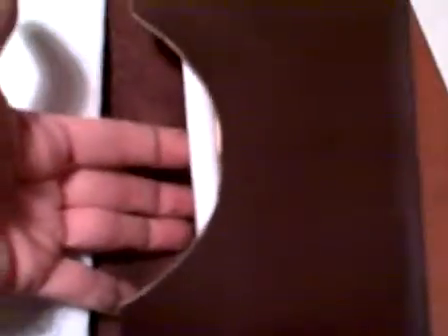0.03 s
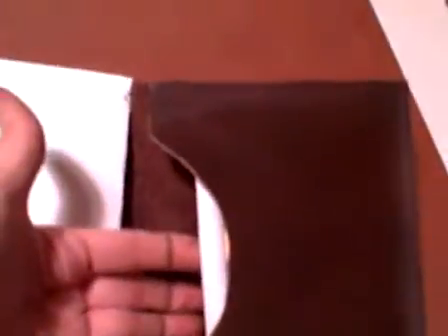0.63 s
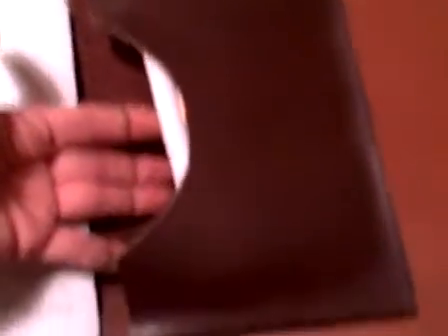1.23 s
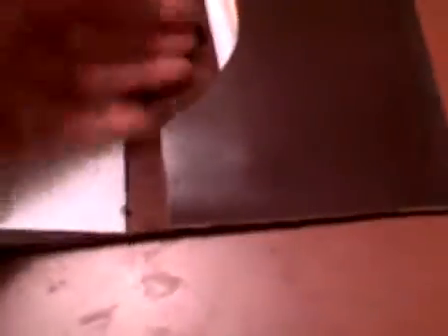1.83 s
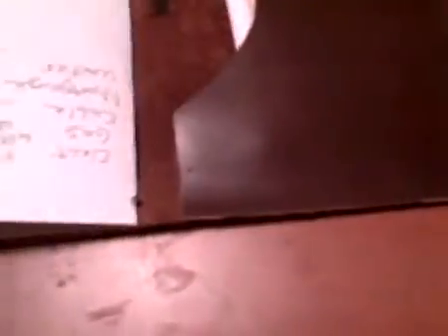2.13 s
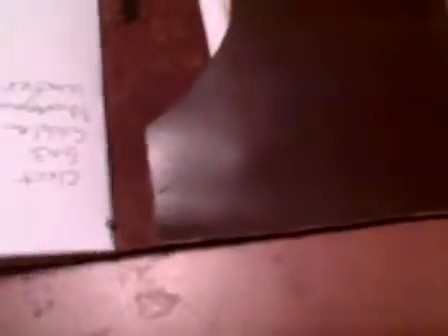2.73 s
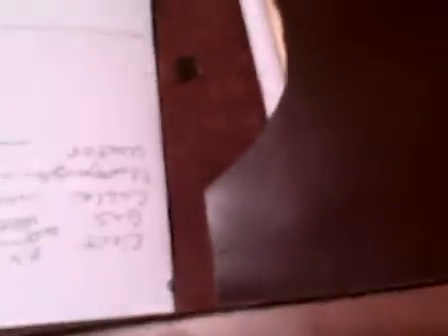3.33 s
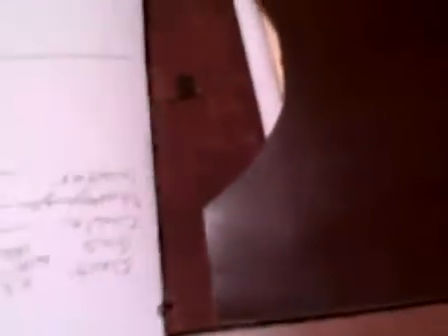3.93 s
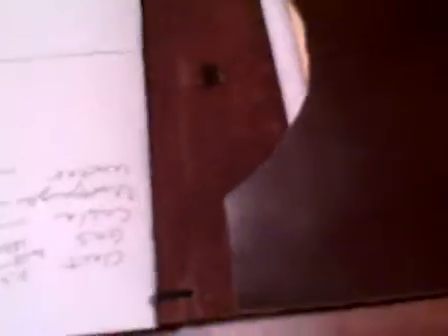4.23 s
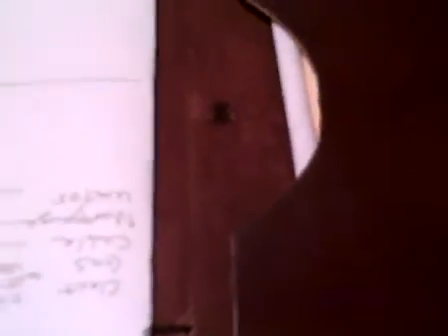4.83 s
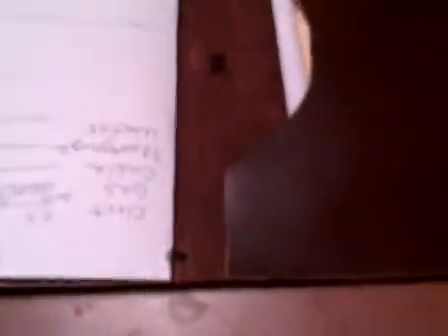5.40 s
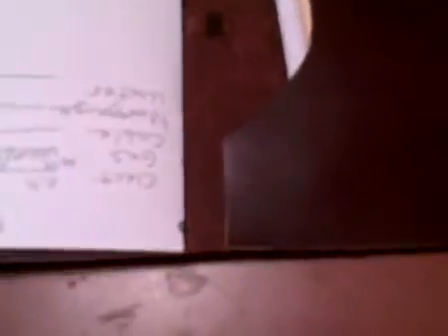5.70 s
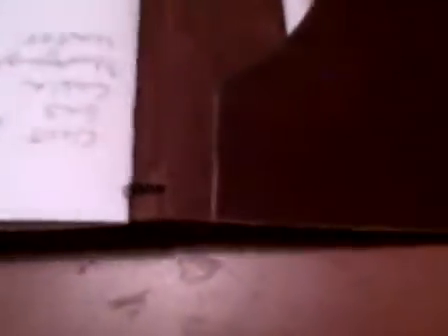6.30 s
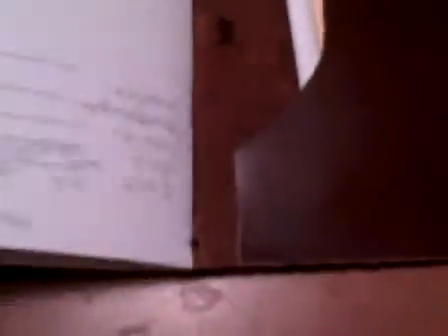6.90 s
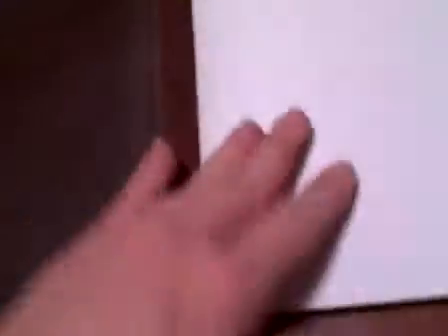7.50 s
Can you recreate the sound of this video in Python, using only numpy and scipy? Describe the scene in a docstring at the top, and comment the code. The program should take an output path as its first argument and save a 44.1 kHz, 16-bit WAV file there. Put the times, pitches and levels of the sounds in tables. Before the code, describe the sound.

A hand slides into a leather folder pocket and shuffles papers, with rustles, crisp snaps and a page turn over quiet room hum.

```python
"""A quiet room hums throughout. Sheets stir, then at 0.9 s a hand slides into the pocket of a leather
folder on a table, skin scraping on leather. From 1.7 s it works the papers: sheets hiss over each other,
leather creaks, creases snap and the cover bumps softly. Lighter strokes follow, a hard tap on the cover
at 6.5 s, and last a page turns. The small microphone rings near 6.5 kHz and passes little above that."""
import sys
import numpy as np
from scipy import signal
from scipy.fft import rfft, irfft
from scipy.io import wavfile

SR = 44100
rng = np.random.default_rng(int(sys.argv[2]) if len(sys.argv) > 2 else 0)


def master(y):
    """Save y as 16-bit WAV."""
    cut = np.clip(np.atleast_2d(y).T, -1, 1)
    pcm = np.round(cut * 32767)  # scale
    wavfile.write(sys.argv[1], SR, pcm.astype(np.int16))


N = 332955


def from_db(db):
    """Decibels to gain."""
    return 10 ** (np.asarray(db) / 20)


def unit_rms(x):
    """Scale to unit power."""
    return x / np.sqrt(np.mean(x ** 2) + 1e-20)


def automation(rows):
    """Join timed breakpoints with straight lines, one curve per value column."""
    times, *columns = np.transpose(rows)
    return [np.interp(np.arange(N) / SR, times, column) for column in columns]


def drift(rate_hz):
    """Slow random modulation with a spread of 1."""
    hop, settle = 40, 2000
    pole = np.exp(-2 * np.pi * rate_hz * hop / SR)
    noise = rng.standard_normal(N // hop + settle + 2)
    slow = signal.lfilter([1], [1, -2 * pole, pole * pole], noise)[settle:]
    return np.interp(np.arange(N) / hop, np.arange(len(slow)), unit_rms(slow))


def equalise(x, spectrum):
    """Apply an EQ curve that falls 20 dB per octave beyond its ends; rms 1."""
    hz, db = np.transpose(spectrum)
    octave = np.log2(np.maximum(np.fft.rfftfreq(len(x), 1 / SR), 1))
    beyond = np.abs(octave - np.clip(octave, np.log2(hz[0]), np.log2(hz[-1])))
    gain = from_db(np.interp(octave, np.log2(hz), db) - 20 * beyond)
    return unit_rms(irfft(rfft(x) * gain, len(x)))


def place(out, start_s, sound):
    """Mix a one-shot in at its cue."""
    i = int(start_s * SR)
    out[i:i + len(sound)] += sound[:N - i]


def microphone(x, ring_hz=6570, width_hz=1160, ring_gain=1.54, top_hz=7440):
    """The port of the capsule rings at one pitch; above it the response drops quickly."""
    port = signal.lfilter(*signal.iirpeak(ring_hz, ring_hz / width_hz, fs=SR), x)
    return signal.sosfilt(signal.butter(9, top_hz, fs=SR, output="sos"), x + ring_gain * port)


def wavering_tone(hz):
    """A sine slightly unsteady in pitch and level; rms 1."""
    phase = 2 * np.pi * np.cumsum(hz + drift(5.75)) / SR
    return unit_rms(np.sin(phase) * from_db(2 * drift(3.6)))


# EQ of the room rumble and the microphone hiss: (frequency [Hz], relative level [dB])
RUMBLE_EQ = [(22, -13), (30, 0), (42, 0.5), (60, -1), (85, -6), (118, -6), (145, -12.5), (200, -9),
             (260, -15), (320, -11), (450, -19), (700, -25), (1000, -23.5), (1500, -45)]
MIC_HISS_EQ = [(700, -6.5), (1300, -1), (3000, -2), (5000, -2), (7000, -2), (8500, -5)]
# Partials of the room hum: (frequency [Hz], rms level [dB])
HUM_PARTIALS = [(41, -56), (86, -58.5), (99, -62), (172, -63), (221, -63.5), (299, -64.5), (342, -65.5),
                (458, -68.5), (684, -72)]
# Two faint drones that swell and glide: (time [s], pitch [Hz], rms level [dB])
UPPER_DRONE = [(0, 190, -68), (1.0, 190, -56), (1.5, 189, -60), (2.0, 187, -54), (2.8, 186, -55),
               (3.3, 184, -65), (4.1, 186, -60), (4.6, 198, -55), (5.1, 206, -52.5), (5.5, 207, -64),
               (5.8, 190, -67), (6.4, 192, -57), (6.9, 195, -55), (7.55, 192, -61)]
LOWER_DRONE = [(3.45, 102, -85), (3.6, 102, -51), (3.9, 104, -54), (4.25, 108, -59), (4.5, 108, -85)]


def room_tone():
    """The bed: room rumble, hum, swelling drones and the hiss of the microphone."""
    rumble = from_db(-47.5) * equalise(rng.standard_normal(N), RUMBLE_EQ)
    hiss = from_db(-58.0) * equalise(rng.standard_normal(N), MIC_HISS_EQ)
    hum = sum(from_db(db) * wavering_tone(hz) for hz, db in HUM_PARTIALS)
    drones = sum(from_db(db) * wavering_tone(hz) for hz, db in map(automation, (UPPER_DRONE, LOWER_DRONE)))
    return rumble + hiss + hum + drones


def reflections(x, t60_s=0.11, predelay_s=0.002):
    """The table and near walls return a short diffuse tail."""
    t = np.arange(SR // 3) / SR
    tail = rng.standard_normal(len(t)) * from_db(-60 * t / t60_s) * (t > predelay_s)
    return signal.fftconvolve(x, tail / np.linalg.norm(tail))[:N]


# Soft thuds of hand and cover: (time [s], level [dB], pitch [Hz], decay [s])
BUMP_CUES = [(0.534, -29, 172, 0.0072), (1.296, -37, 478, 0.019), (2.155, -34.5, 417, 0.0061),
             (2.718, -38, 126, 0.018), (2.998, -32, 594, 0.0039), (3.004, -29.5, 167, 0.0043),
             (3.281, -35, 1240, 0.0051), (3.312, -42, 280, 0.013), (3.564, -26, 151, 0.0044),
             (6.937, -32.5, 147, 0.012), (7.283, -44, 520, .006), (7.431, -36, 52.7, 0.058),
             (7.5, -28.5, 63, 0.015)]


def cover_bumps(attack_s=0.0006):
    """The padded cover answers a soft push with one damped low note."""
    out, t = np.zeros(N), np.arange(SR // 4) / SR
    for start, db, hz, decay in BUMP_CUES:
        envelope = np.exp(-t / decay) * (1 - np.exp(-t / attack_s))
        place(out, start, from_db(db) * np.sin(2 * np.pi * hz * t) * envelope)
    return out


# Resonances of the stiff cover: (frequency [Hz], level [dB], decay [s])
COVER_MODES = [(420, -35.5, 0.0061), (690, -35, 0.0064), (1380, -27, 0.0021), (2110, -19.5, 0.0013),
               (4300, -25, .0008), (7500, -14, 0.00087)]
# Hard taps on it: (time [s], gain [dB], pitch [ratio])
TAP_CUES = [(6.5378, 4, 0.997), (4.118, -7.5, 1.196)]


def cover_taps():
    """A hard touch sets the stiff cover ringing for a few milliseconds, higher where it is held taut."""
    out, t = np.zeros(N), np.arange(SR // 10) / SR
    for start, gain_db, pitch in TAP_CUES:
        for k, (hz, db, decay) in enumerate(COVER_MODES):
            mode = np.sin(2 * np.pi * pitch * hz * t) * np.exp(-t / decay)
            place(out, start, (-1) ** k * from_db(gain_db + db) * mode)
    return out


def friction(spectrum, slips_per_s, spread_db, smooth, flutter_db):
    """Fibres catch and let go: tiny slips over a smooth rub; rms 1 once through the microphone."""
    sizes = from_db(spread_db * np.minimum(rng.exponential(1, N), 3.2)) * rng.choice([-1, 1], N)
    slips = unit_rms(sizes * (rng.random(N) < slips_per_s / SR))
    pressure_db = 2 * flutter_db * np.tanh(drift(40) / 2)   # the hand never presses evenly
    rub = equalise(slips + smooth * rng.standard_normal(N), spectrum) * from_db(pressure_db)
    return rub / np.std(microphone(rub))


def stroke(start, end, crest_share):
    """Envelope of one stroke: loudness follows the speed, which rises to a crest and falls to rest."""
    crest = start + np.clip(crest_share, .05, .95) * (end - start)
    speed = np.sin(np.pi / 2 * np.interp(np.arange(N) / SR, [start, crest, end], [0, 1, 0]))
    return speed ** 0.67


# Leather creaking under the fingers: (start [s], end [s], crest [share of stroke], level [dB])
CREAK_CUES = [(1.66, 1.779, .65, -47.5), (2.873, 2.905, .5, -49.5), (3.135, 3.178, .4, -52),
              (3.27, 3.33, .2, -49.5)]
# Its throaty EQ: (frequency [Hz], relative level [dB])
CREAK_EQ = [(900, -16), (1350, -1.5), (1800, -2.5), (2400, 0.5), (3300, -13)]


def leather_creaks():
    """Pressed leather sticks and slips, and the pocket gives it a throaty colour."""
    gain = sum(from_db(db) * stroke(start, end, crest) for start, end, crest, db in CREAK_CUES)
    return gain * friction(CREAK_EQ, slips_per_s=450, spread_db=3.0, smooth=0.4, flutter_db=2.0)


# Snaps of paper and leather: (time [s], band level [dB], tilt [dB/octave], decay [ms], ring [Hz])
SNAP_CUES = [(0.536, -44.5, 2.5, 1.6, 1600), (0.5425, -47.5, 4.5, 2.4, 2400), (0.6824, -58, -3, 1.1, 3500),
             (0.9069, -35.5, 4.5, 1.4, 3400), (0.946, -50.5, -3.5, 1.6, 1050),
             (0.955, -48.5, -2, 1.6, 1950), (1.075, -48, -2.5, 1.3, 3830), (1.573, -42.5, 2, 1.3, 1830),
             (1.65, -40.5, -1.1, 2, 1300), (1.6622, -39, -0.1, 1.4, 2400), (1.772, -52, 7, 2.0, 1900),
             (1.879, -51, -2, 2.4, 1800), (2.139, -47.5, 1.5, 2.2, 5700), (2.1878, -53.5, 6, 3.1, 3950),
             (2.342, -41.5, 6, 4.6, 6500), (2.4743, -31, 4.5, 1.2, 4580), (2.476, -29.5, 6, 2.8, 5700),
             (2.481, -36, 6, 2.5, 2620), (2.4952, -31, 5.5, 1.3, 6240), (2.497, -37.5, 1, 2.5, 2630),
             (2.553, -47.5, 12, 2.9, 6000), (2.562, -43, 8, 2, 6400), (2.6647, -45.5, 1, 1.5, 5650),
             (2.691, -40, 2, 1.3, 4270), (2.7028, -45, 1, .8, 3780), (2.7198, -28, 2.1, 0.73, 5040),
             (2.8933, -42.5, 2, 0.97, 2300), (2.949, -47.5, 1.5, 1.8, 5600), (3.107, -50.5, 1, 1.2, 3750),
             (3.12, -48.5, -1, 1.4, 4780), (3.28, -41.5, 1, 1.7, 1290), (3.5626, -47, 3.5, 2.5, 5680),
             (3.6812, -34, 4, 0.71, 4600), (4.0189, -51, 6, 1.3, 6440), (4.1178, -37, 1.2, 0.47, 3700),
             (5.219, -49, 2, 2, 5660), (5.2744, -55, 6, 2.7, 2960), (5.972, -53.5, 1.5, 1.5, 1900),
             (6.097, -57.5, 7, .8, 6400), (6.538, -31, 1.5, 0.95, 4740), (6.553, -44, 2, 1.7, 2350),
             (6.57, -48, -3, 2.1, 2240), (6.7192, -51.5, 3.5, 2.5, 4720), (6.7901, -54, 4.5, 1.2, 5660),
             (7.3511, -48, 1.5, 2.1, 2180), (7.3973, -51.5, -0.5, 2.0, 3710), (7.4275, -50, 10, 2.1, 5100),
             (7.499, -43, 5, 0.83, 5670)]
# Edges of the four bands that shape a snap: (frequency [Hz])
SNAP_BANDS = [300, 1200, 3000, 5500, 9000]


def crease_snaps(pivot_hz=3000, ring_mix=0.97, ring_q=4.3, lift_octaves=0.37):
    """A crease gives way in one jerk and a quick crumple; the free patch of sheet rings briefly."""
    out, t = np.zeros(N), np.arange(SR // 50) / SR
    centres = np.sqrt(np.multiply(SNAP_BANDS[:-1], SNAP_BANDS[1:]))
    jerk = 2.57 * signal.unit_impulse(len(t), SR // 2000)
    for start, level_db, tilt_db, decay_ms, ring_hz in SNAP_CUES:
        near_ring = np.exp(-(np.log2(centres / ring_hz) / lift_octaves) ** 2)
        lift_db = 4.5 * near_ring / max(decay_ms, .5)   # a cleaner jerk rings more
        bands_db = level_db + tilt_db * np.log2(centres / pivot_hz) + lift_db
        crumple = rng.standard_normal((len(centres), len(t))) * np.exp(-t * 1000 / decay_ms)
        force = crumple + jerk
        sheet = force + ring_mix * signal.lfilter(*signal.iirpeak(ring_hz, ring_q, fs=SR), force)
        for db, motion, low, high in zip(bands_db, sheet, SNAP_BANDS, SNAP_BANDS[1:]):
            snap = signal.sosfilt(signal.butter(2, [low, high], "band", fs=SR, output="sos"), motion)
            rms_over_5ms = np.linalg.norm(microphone(snap)) / np.sqrt(0.005 * SR)
            place(out, start, from_db(db) * snap / rms_over_5ms)
    return out


# The hand entering the pocket: (time [s], leather level [dB], paper level [dB])
POCKET_DRAG = [(0.9, -68, -50), (0.94, -57, -53), (0.95, -46, -44.5), (1.09, -46, -44),
               (1.12, -45.5, -40.5), (1.165, -42.5, -40), (1.25, -48.5, -47), (1.31, -39.5, -44),
               (1.335, -51.5, -49), (1.52, -73, -62.5)]


def pocket_envelopes():
    """One long drag of the hand: gains for skin on leather and for the sheets it brushes."""
    t = np.arange(N) / SR
    return from_db(automation(POCKET_DRAG)) * (t > POCKET_DRAG[0][0]) * (t < POCKET_DRAG[-1][0])


# Sheets pushed over each other: (start [s], end [s], crest [share of stroke], hiss [dB], rasp [dB])
PAPER_STROKES = [(0.08, 0.164, .5, -58, -66), (0.22, 0.48, 0.38, -59.5, -63.5),
                 (0.488, 0.93, 1, -58, -59.5), (1.665, 1.72, 0.76, -50, -54),
                 (1.71, 1.774, 0.37, -42, -46.5), (1.79, 1.90, .5, -52, -61.5),
                 (1.881, 2.03, 0.48, -36.5, -51), (2.01, 2.129, 0.48, -37.5, -50),
                 (2.173, 2.29, 0.98, -49, -59.5), (2.338, 2.497, 0.42, -40.5, -49.5),
                 (2.459, 2.535, .25, -40, -43.5), (2.52, 2.63, 0.27, -39, -48),
                 (2.614, 2.718, 0.8, -44, -48), (2.712, 2.738, 0.36, -39, -41.5),
                 (2.767, 2.822, 0.76, -45, -47.5), (2.816, 2.93, 0.36, -49, -49),
                 (2.98, 3.048, 0.2, -50, -52), (3.039, 3.105, 0.4, -48.5, -51.5),
                 (3.11, 3.23, 0.4, -48, -49.5), (3.236, 3.424, 0.33, -43, -47.5),
                 (3.48, 3.607, 0.41, -53.5, -58.5), (3.617, 3.72, 0.94, -51.5, -56),
                 (3.722, 3.87, 0.3, -50, -58), (3.854, 4.005, 0.48, -49.5, -56.5),
                 (3.99, 4.072, 0.58, -49, -52.5), (4.043, 4.216, 0.57, -48.5, -55),
                 (4.2, 4.41, .55, -48.5, -57), (4.453, 4.59, 0.74, -53.5, -59), (4.6, 4.76, .2, -57, -71),
                 (4.826, 4.905, .75, -54.5, -61), (4.934, 5.086, 0.49, -56.5, -65),
                 (5.107, 5.3, 0.19, -53, -57), (5.28, 5.47, 0.79, -56, -63),
                 (5.461, 5.567, 0.17, -46.5, -54), (5.586, 5.66, .4, -58, -66),
                 (5.766, 5.968, .6, -51, -64), (5.977, 6.255, .45, -52, -60),
                 (6.53, 6.598, .12, -46, -48.5), (6.645, 6.92, 0.25, -51.5, -57.5),
                 (6.888, 7.14, 0.6, -47, -55.5), (7.119, 7.202, 1, -36, -46.5), (7.198, 7.28, .4, -48, -58),
                 (7.259, 7.315, .5, -45.5, -49), (7.314, 7.486, 0.86, -48, -53.5),
                 (7.497, 7.57, .6, -47.5, -55)]


def paper_envelopes():
    """Overlapping strokes add in power: gains for the hiss of gliding and the rasp of pressing."""
    power = sum((from_db(levels_db)[:, None] * stroke(start, end, crest)) ** 2
                for start, end, crest, *levels_db in PAPER_STROKES)
    return np.sqrt(power)


# EQ of the leather scrape and the paper's rasp, hiss and crinkle: (frequency [Hz], relative level [dB])
SCRAPE_EQ = [(250, -25), (380, -9), (460, -1), (650, 0), (800, -4), (1000, -4), (1300, -12), (2200, -28)]
RASP_EQ = [(700, -19.5), (1200, -3), (1900, 1), (2800, 1), (4000, 2.5), (5000, 0), (6500, -16)]
HISS_EQ = [(2500, -25), (3800, -12.5), (5000, -5), (6000, 0), (7200, -1), (8500, -4.5)]
CRINKLE_EQ = [(1200, -12.5), (2500, -4.5), (4500, 3), (8000, -1.5)]


def sliding():
    """Skin drags on the hollow leather pocket while the sheets rasp, hiss and crinkle over each other."""
    glide, press = paper_envelopes()
    skin, sheets = pocket_envelopes()
    scrape = friction(SCRAPE_EQ, slips_per_s=570, spread_db=0.0, smooth=0.7, flutter_db=2.5)
    rasp = friction(RASP_EQ, slips_per_s=600, spread_db=6.0, smooth=1.0, flutter_db=2.8)
    hiss = friction(HISS_EQ, slips_per_s=1900, spread_db=3.0, smooth=0.61, flutter_db=1.9)
    crinkle = friction(CRINKLE_EQ, slips_per_s=80, spread_db=1.5, smooth=0.1, flutter_db=-1.5)
    return (scrape * (from_db(-7.5) * press + skin)
            + rasp * (press + from_db(-5) * sheets)
            + hiss * (glide + from_db(-1.1) * sheets)
            + crinkle * from_db(-15.5) * (glide + sheets))


def scene():
    """Close handling with a touch of reverb over the room tone, in mono."""
    handling = sliding() + leather_creaks() + crease_snaps() + cover_taps() + cover_bumps()
    reverb = from_db(-14) * reflections(handling)
    return (handling + reverb + room_tone())[None]


def record(dry, stopband_hz=9950):
    """The microphone colours the sound and a steep low-pass cuts the top."""
    return signal.sosfilt(signal.cheby2(12, 60, stopband_hz, fs=SR, output="sos"), microphone(dry))


dry = scene()
out = record(dry)
master(out)
```